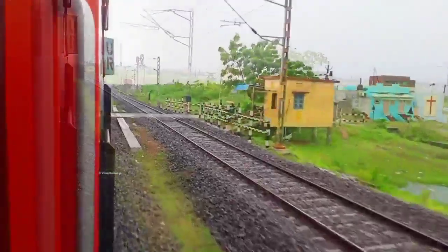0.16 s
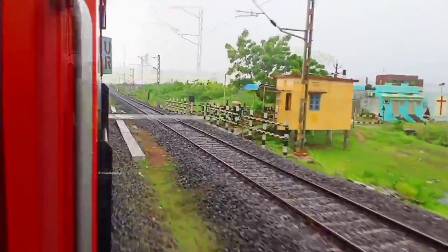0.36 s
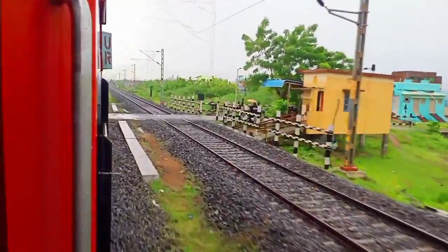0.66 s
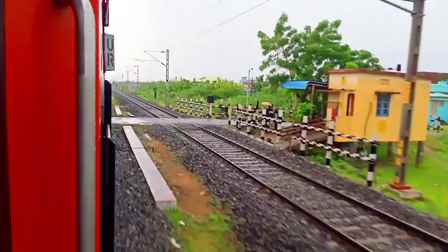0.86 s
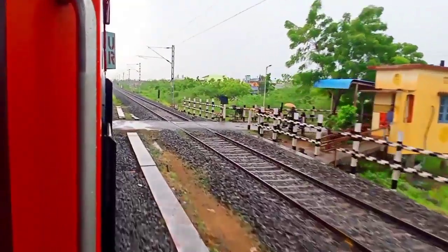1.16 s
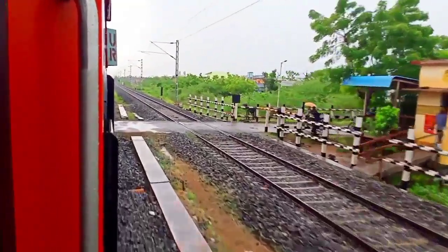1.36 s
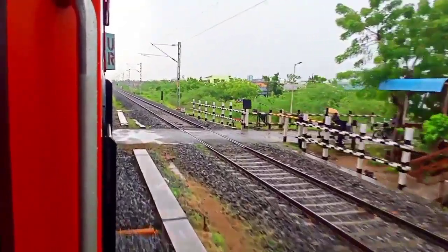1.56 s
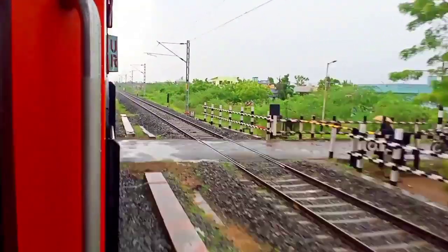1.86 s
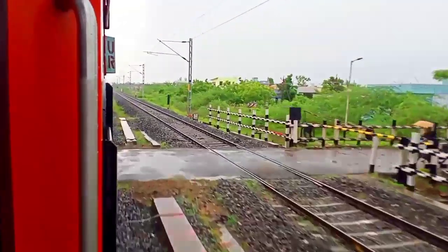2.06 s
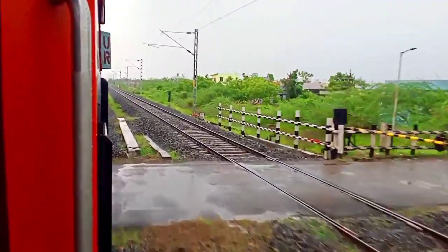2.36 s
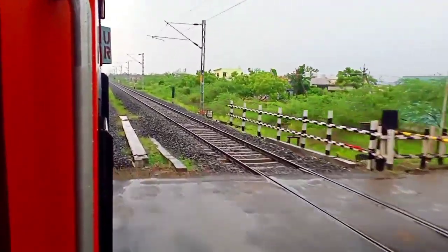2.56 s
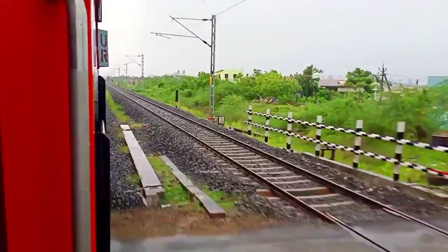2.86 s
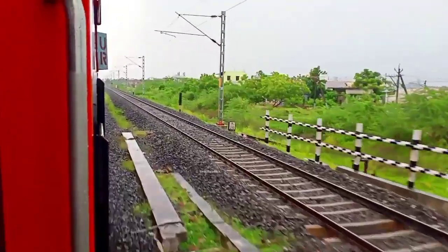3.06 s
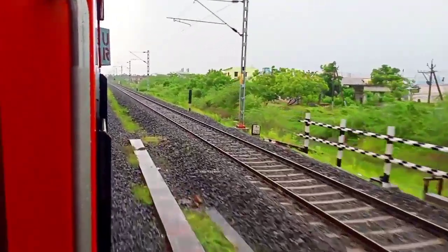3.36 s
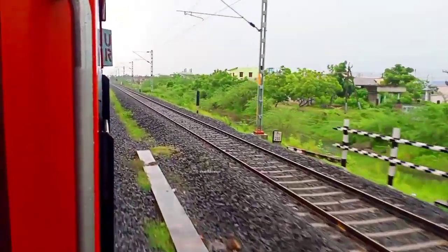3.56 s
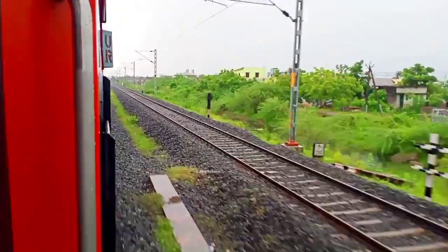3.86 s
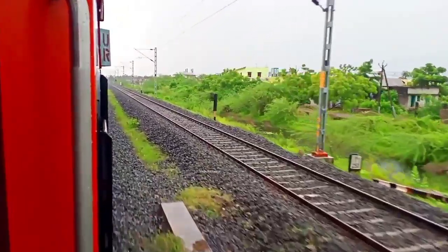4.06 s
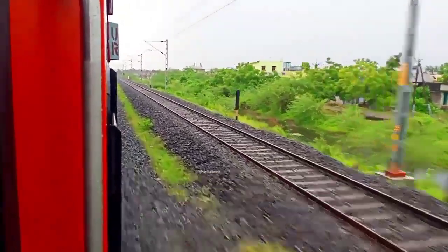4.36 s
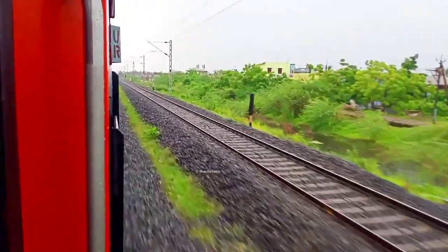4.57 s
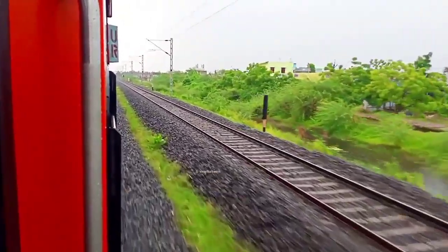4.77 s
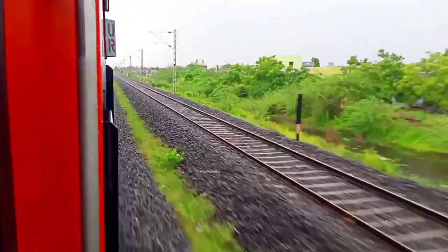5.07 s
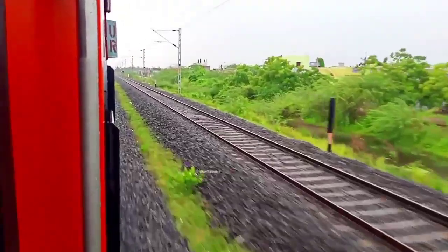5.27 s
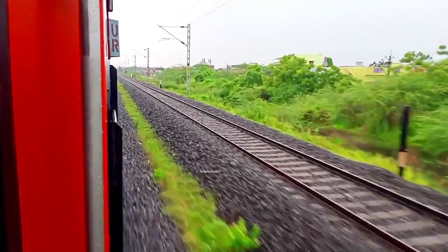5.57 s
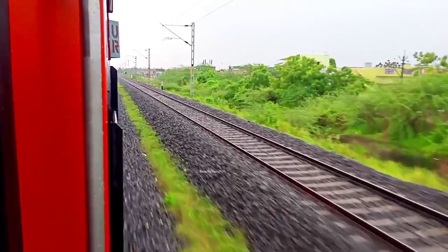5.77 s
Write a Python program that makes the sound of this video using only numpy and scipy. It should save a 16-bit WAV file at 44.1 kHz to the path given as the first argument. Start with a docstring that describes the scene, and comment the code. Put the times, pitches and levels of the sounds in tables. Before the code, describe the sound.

A mono doorway perspective on a fast passenger train: low body drone, grainy ballast roar and fine air hiss start quiet and rise within three seconds. A wheel briefly sings, rough rail makes the metal ringing surge, and damped frame knocks land unevenly. Low slipstream buffets bump the microphone all along; a thin high electric whine lies underneath. Dry, open air, with little echo except behind the opening chirps.

```python
"""A passenger train runs over a level crossing at speed, heard from an open coach doorway.
Two quick whistled chirps come first, among knocks of a damped frame, slipstream thuds and a thin electric whine.
Coach drone, track roar, wheel ring and air hiss share one rolling level: they fade in over the opening, peak near
2.8 s, sag, return and ease. Rough rail lifts the wheel ring, and one wheel mode sings from 2.05 s.
Buffets go on through the ride, with a few ticks; soft spits of hiss come near the end."""
import sys
import numpy as np
from scipy import signal
from scipy.fft import rfft, irfft
from scipy.io import wavfile

SR = 44100
rng = np.random.default_rng(int(sys.argv[2]) if len(sys.argv) > 2 else 0)


def to_wav(s):
    """Save 16-bit WAV."""
    ch = np.atleast_2d(s).T  # columns
    pcm = np.round(np.clip(ch, -1, 1) * 32767)  # PCM
    wavfile.write(sys.argv[1], SR, pcm.astype(np.int16))


N = 261072
TIME = np.arange(N) / SR  # s
CRUISE_DB = -32  # rolling level at which every layer has its own plain level
SING_HZ = 2637  # the wheel mode that sings at the crossing
WHEEL_TURNS_PER_S = 8
ROUGH_RAMP_S = 0.076  # the wheels run onto and off rough rail in this time
EDGE_HZ = 15550  # upper band limit


def amp(db):
    """Decibels to gain."""
    return 10 ** (np.asarray(db) / 20)


def unit(x):
    """Scales to rms 1."""
    return x / np.sqrt(np.mean(x ** 2) + 1e-20)


def follow(table, column):
    """One column of a curve over time, at every sample."""
    rows = np.array(table)
    return np.interp(TIME, rows[:, 0], rows[:, column])


def add(mix, s, sound):
    """Mixes a sound in at time s, cut off at the end of the mix."""
    part = mix[max(round(s * SR), 0):][:len(sound)]
    part += sound[:len(part)]


def colour(x, points):
    """Filters x by a spectrum given as points on a log-frequency axis."""
    hz, db = np.transpose(points)
    bins = np.fft.rfftfreq(len(x), 1 / SR)
    gain = amp(np.interp(np.log(bins + 1), np.log(hz), db, right=-120))
    return irfft(rfft(x) * gain, len(x))


def noise(points):
    """Noise of rms 1 with the given spectrum."""
    return unit(colour(rng.standard_normal(N), points))


def drift(rate):
    """Smooth random motion of rms 1, with little above rate in hertz."""
    bins = np.fft.rfftfreq(N, 1 / SR)
    smooth = rfft(rng.standard_normal(N)) / (1 + (bins / rate) ** 4)
    return unit(irfft(smooth, N))


def resonance(hz, width):
    """A mode kept ringing by noise: two one-pole stages give it steep skirts."""
    # pi / 2 widens each stage so that the pair together has the stated width
    pole = np.exp((-np.pi * width * np.pi / 2 + 2j * np.pi * hz) / SR)
    return unit(signal.lfilter([1], np.poly([pole, pole]), rng.standard_normal(N)).real)


def stretch(s, length, ramp):
    """A gate with sloping edges, crossing one half at s and at s + length."""
    return np.clip(.5 + np.minimum(TIME - s, s + length - TIME) / ramp, 0, 1)


def rolling(share):
    """Decibels by which a layer follows the rolling level, taking its own share of the swing."""
    # level of the rolling layers over time, with a fade-in at the opening: t/s, level/dB
    rolling_curve = [(0.0, -45), (0.79, -43.5), (1.5, -34), (2.78, -28), (3.23, -33), (3.91, -29.5),
                     (4.15, -31), (5.04, -34.5), (5.92, -32.5)]
    return share * (follow(rolling_curve, column=1) - CRUISE_DB)


def air(level_db=-57.5, share=0.83, flicker_db=1.0):
    """Fine hiss of air along the coach side; it follows the rolling level up to its cruising strength."""
    # hiss spectrum: f/Hz, relative level/dB per Hz
    hiss_spectrum = [(2500, -17.5), (4600, 11.5), (5100, 1.5), (5600, 3.5), (6400, -2), (7600, 1.5),
                     (8400, 4), (9100, -2), (9700, -8.5), (11500, -12), (15500, -12.5)]
    swing_db = np.minimum(rolling(share), 0)
    return noise(hiss_spectrum) * amp(level_db + swing_db + flicker_db * drift(rate=24))


def whine(level_db=-5.5, rise_db_per_s=1.78, waver_db=2.0):
    """The coach's power converter: one thin line, slowly growing, with weak neighbours that wander with it."""
    # electric whine lines: f/Hz, relative rms level/dB
    line_table = [(7956, -82), (8134, -87.5), (8178, -69), (8221, -84.5), (8307, -87.5)]
    wander_hz = .8
    wander = np.cumsum(wander_hz * drift(rate=8.6)) / SR  # in cycles, shared by all lines
    lines = np.zeros(N)
    for hz, db in line_table:
        cycles = hz * TIME + wander + rng.random()
        lines += amp(db) * np.sqrt(2) * np.sin(2 * np.pi * cycles)
    return lines * amp(level_db + rise_db_per_s * TIME + waver_db * drift(rate=4))


def ticks(octaves=0.59):
    """Light ticks and soft spits of hiss: bright noise bursts that die without ringing."""
    # bursts: t/s, level before rise and decay/dB, rise time constant/s, 60 dB decay time/s, centre f/Hz
    burst_table = [(0.612, -57, .005, 0.043, 8500), (1.588, -40.5, .0008, 0.068, 8100),
                   (2.21, -50, .008, .12, 7460), (2.88, -54, .02, 0.19, 9500),
                   (3.426, -51, .004, .08, 8900), (3.48, -53, .02, .3, 8300),
                   (4.062, -52, .002, .04, 12000), (4.842, -33, .02, 0.16, 2900),
                   (5.142, -31, .03, 0.28, 3100), (5.32, -25.5, 0.029, .24, 2920),
                   (5.33, -47, 0.018, 0.19, 7000)]
    t, out = np.arange(SR // 4) / SR, np.zeros(N)
    bins = np.fft.rfftfreq(len(t), 1 / SR) + 1
    for s, db, rise, t60, hz in burst_table:
        band = 1 / (1 + (np.log2(bins / hz) / octaves) ** 2) ** 2
        burst = unit(irfft(rfft(rng.standard_normal(len(t))) * band, len(t)))
        envelope = (1 - np.exp(-t / rise)) * np.exp(-np.log(1000) * t / t60)
        add(out, s, amp(db) * burst * envelope)
    return out


def chirp(s, length, top_hz, rest_hz, db, lift_s=.02, waver_hz=40, ramp=.02, echo_db=-1, echo_t60=0.3):
    """An unsteady whistle that flicks up, falls back and levels out, with a diffuse outdoor echo."""
    age = (np.maximum(TIME - s, 0) / lift_s) ** 2
    flick = age * np.exp(1 - age)  # peaks at 1, lift_s after the start
    hz = rest_hz + (top_hz - rest_hz) * flick + waver_hz * drift(rate=80)
    tone = stretch(s, length, ramp) * amp(db) * np.sin(2 * np.pi * np.cumsum(hz) / SR)
    t = TIME[:SR // 2]
    decay = np.exp(-np.log(1000) * t / echo_t60)
    tail = rng.standard_normal(len(t)) * decay * (1 - np.exp(-t / .03))
    echo = signal.fftconvolve(tone, tail / np.linalg.norm(tail))[:N]
    return tone + amp(echo_db) * echo


def chirps():
    """Two short high whistles, each a sine gliding in pitch."""
    # chirps: t/s, length/s, top f before waver/Hz, resting f before waver/Hz, peak level of the dry tone/dB
    chirp_table = [(0.065, .1, 4780, 4215, -52), (.148, .042, 6000, 4900, -66)]
    return sum(chirp(*row) for row in chirp_table)


def wind(level_db=3, lump_db=2.5):
    """Lumpy low rumble of the slipstream at the microphone: small eddies pass at random."""
    # rumble spectrum: f/Hz, relative level/dB per Hz
    rumble_spectrum = [(20, -42), (35, -33), (50, -22.5), (75, -5), (115, -5), (160, -3.5), (250, -31),
                       (600, -31)]
    # strength of the slipstream, ahead of level_db: t/s, level/dB
    gust_curve = [(0.0, -33), (0.54, -40.5), (2.32, -29), (2.69, -37), (3.17, -25), (3.53, -37.5),
                  (4.3, -28.5), (5.59, -35), (5.92, -38)]
    gust_db = follow(gust_curve, column=1)
    return noise(rumble_spectrum) * amp(gust_db + level_db + lump_db * drift(rate=12))


def singing_wheel(start=2.05, length=.31, level_db=-41, throb_db=3, ramp=0.028):
    """One wheel mode sings briefly at the crossing, swelling once with each turn of the wheel."""
    throb = np.sin(2 * np.pi * WHEEL_TURNS_PER_S * (TIME - start))
    gain = amp(level_db + throb_db * throb)
    return resonance(SING_HZ, width=22) * stretch(start, length, ramp) * gain


def knocks(pivot_hz=300, scatter=0.043, contact=0.0029, rebound=.009, rebound_db=-7):
    """Each blow rings the damped frame and rebounds once; a harder one puts more into the upper modes."""
    # sharp knocks from the running gear: t/s, peak level/dB, hardness as tilt about pivot_hz/dB per octave
    knock_table = [(0.098, -9, -2.5), (0.473, -20, -1), (.665, -25, 6), (1.186, -18, 3), (1.648, -6.5, 7),
                   (2.158, -21, 1), (2.37, -18, -1), (3.16, -18, 5), (4.259, -9, -8)]
    # frame modes: f before scatter/Hz, relative level before hardness/dB, 60 dB decay time/s
    frame_modes = [(135, 2.5, 0.046), (208, -10, 0.041), (311, 2, 0.051), (532, 1.5, 0.03),
                   (684, -13.5, 0.064), (802, -13, 0.038), (1140, -12, 0.02), (1535, -23, 0.03)]
    t, out = np.arange(SR // 5) / SR, np.zeros(N)
    hz, mode_db, t60 = np.transpose(frame_modes)[:, :, None]
    swell = 1 - np.exp(-(t / contact) ** 2)  # a heavy contact builds up without a click
    all_detunes = rng.standard_normal((len(knock_table), 2, len(frame_modes), 1))
    for (s, db, hardness), detunes in zip(knock_table, all_detunes):
        tilt_db = hardness * np.log2(hz / pivot_hz)
        decay = amp(mode_db + tilt_db) * np.exp(-np.log(1000) * t / t60)
        for bounce, detune in enumerate(detunes):  # 0 is the blow, 1 its rebound
            modes = decay * np.sin(2 * np.pi * hz * (1 + scatter * detune) * t)
            ring = swell * modes.sum(axis=0)
            add(out, s + bounce * rebound, amp(db + bounce * rebound_db) * ring / abs(ring).max())
    return out


def buffets(thud_db=0, rush_db=0, edge=0.014, taper=0.57):
    """Eddies shed by the door edge hit the microphone: a low thud, and a rush as they break up."""
    # thud spectrum: f/Hz, relative level/dB per Hz
    thud_spectrum = [(20, -45), (45, -29), (75, -8.5), (115, -1), (150, 4), (180, 2), (212, 3), (255, -5.5),
                     (340, -14), (480, -28.5), (900, -42), (2000, -71)]
    # rush spectrum: f/Hz, relative level/dB per Hz
    rush_spectrum = [(120, -19), (300, 9.5), (520, 7), (850, 1.5), (1200, -6.5), (1700, -16.5),
                     (3000, -22.5), (5000, -42.5), (10000, -63)]
    # large slipstream buffets: t/s, length without edges/s, thud rms level/dB, rush level relative to thud/dB
    buffet_table = [(0.155, 0.043, -27, -19), (0.467, 0.083, -24, -20.5), (0.99, 0.059, -20.5, -12),
                    (1.117, 0.11, -19, -24), (1.18, 0.068, -28, -2.5), (1.34, 0.05, -19.5, -18),
                    (1.621, 0.095, -19, -16), (1.647, .017, -27.5, 3.5), (2.004, 0.083, -19, -13.5),
                    (2.149, 0.048, -16, -6), (2.187, 0.1, -18, -7), (2.365, 0.033, -20.5, -5),
                    (2.924, 0.12, -21.5, -11.5), (3.146, 0.13, -27, -8.5), (3.931, 0.056, -24, -0.5),
                    (4.183, .1, -21, -16), (4.366, 0.024, -19.5, -20), (4.412, 0.031, -24, -24),
                    (4.548, 0.041, -19, -25), (4.626, 0.11, -20.5, -29), (4.84, 0.044, -12.5, -44),
                    (5.122, .08, -16.5, -15), (5.244, 0.086, -19.5, -12), (5.318, 0.07, -14, -15),
                    (5.462, 0.095, -21, -29), (5.776, 0.073, -25, -12)]
    thud, rush, out = noise(thud_spectrum), noise(rush_spectrum), np.zeros(N)
    for s, length, db, bright_db in buffet_table:
        start = max(s - edge / 2, 0)
        shape = signal.windows.tukey(round((length + edge) * SR), taper)
        first = round(start * SR)
        span = slice(first, first + len(shape))
        low = amp(thud_db) * unit(thud[span] * shape)
        bright = amp(bright_db + rush_db) * unit(rush[span] * shape)
        add(out, start, amp(db) * (low + bright))
    return out


def wheels(level_db=-36.5, share=1.17):
    """Rail roughness drives the wheel modes; each wavers a little on its own."""
    # wheel and rail resonances: f/Hz, width/Hz, relative level/dB
    wheel_modes = [(814, 89, -2), (1028, 140, -3), (1262, 150, -5), (1518, 85, 1), (1752, 110, 2),
                   (2131, 70, -4), (2328, 70, -4.5), (2643, 59, -2.5), (2990, 97, -15), (3126, 78, -7),
                   (3710, 54, -17.5), (3880, 71, -12.5), (4630, 260, -26.5), (4600, 110, -25.5)]
    # stretches of rough rail: start t/s, length/s, extra ring level inside the ramps/dB
    rough_table = [(1.195, 0.063, 10.5), (2.547, 0.49, 3.5), (3.637, .36, 4.5)]
    waver_db = 1.9
    ring = sum(resonance(hz, width) * amp(db + waver_db * drift(rate=12.6))
               for hz, width, db in wheel_modes)
    rough_db = sum(db * stretch(s, length, ROUGH_RAMP_S) for s, length, db in rough_table)
    return unit(ring) * amp(level_db + rolling(share) + rough_db)


def track(level_db=-32.0, share=0.89, flutter_db=1.63):
    """Rails and ballast roar under the coach, up to their cruising strength, with a random flutter."""
    # roar spectrum: f/Hz, relative level/dB per Hz
    roar_spectrum = [(150, -13), (330, 5), (480, 1.5), (680, -0.5), (900, 3.5), (1150, -8.5), (1900, -8),
                     (3100, -8.5), (3500, -16.5), (4200, -21), (4700, -23.5), (5200, -38.5), (8000, -59)]
    swing_db = np.minimum(rolling(share), 0)
    return noise(roar_spectrum) * amp(level_db + swing_db + flutter_db * drift(rate=12.0))


def coach(level_db=-27, share=0.6, ring_db=0, waver_db=4.5, lurch_db=1.2):
    """The body drones over its bogies: a broad rumble and a few panel modes that come and go."""
    # drone spectrum: f/Hz, relative level/dB per Hz
    drone_spectrum = [(110, -19), (165, -1.5), (210, 9), (260, 3.5), (335, 1.5), (460, -6), (700, -19.5),
                      (1500, -42.5)]
    # coach body resonances: f/Hz, width/Hz, relative level/dB
    body_modes = [(216.8, 25, 0), (282.8, 27.3, 0), (347.4, 20, -2.5), (411, 32, -5.5), (460.4, 48, -4),
                  (584.4, 20, -8.5)]
    ring = sum(resonance(hz, width) * amp(db + waver_db * drift(rate=12.4))
               for hz, width, db in body_modes)
    drone = noise(drone_spectrum) + amp(ring_db) * unit(ring)
    return unit(drone) * amp(level_db + rolling(share) + lurch_db * drift(rate=7.7))


def scene():
    """Everything that reaches the doorway, as one channel."""
    train = coach() + track() + wheels() + singing_wheel() + knocks() + ticks() + whine()
    slipstream = wind() + buffets() + air()
    return (train + slipstream + chirps())[None]


def record(dry):
    """Band limit: a steep linear-phase low-pass takes away the extreme treble."""
    lowpass = signal.firwin(511, EDGE_HZ, window=("kaiser", 9), fs=SR)
    return signal.oaconvolve(dry, lowpass[None], "same")


dry = scene()
out = record(dry)
to_wav(out)
```